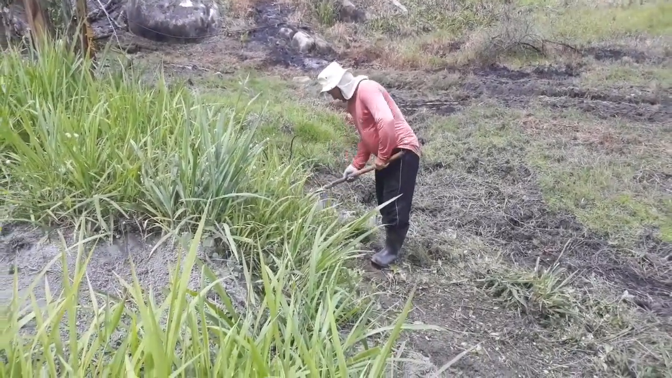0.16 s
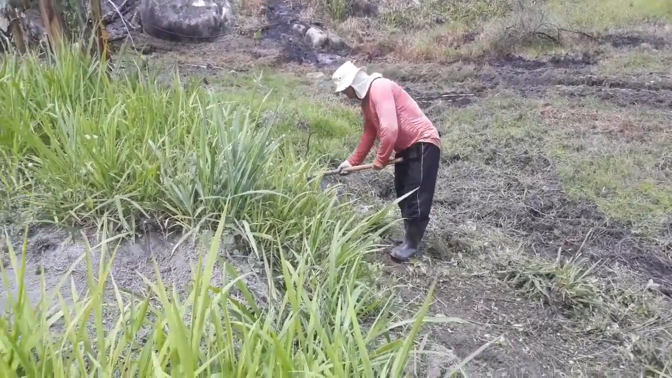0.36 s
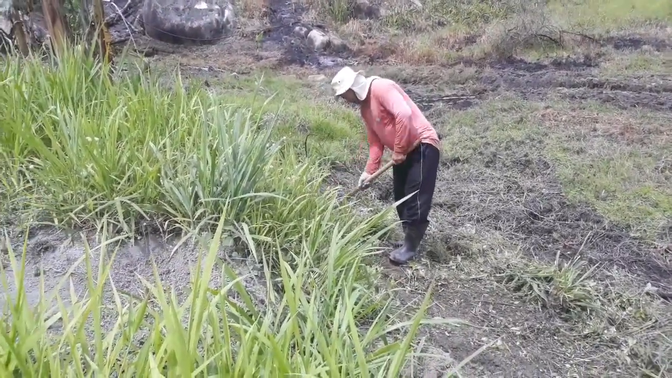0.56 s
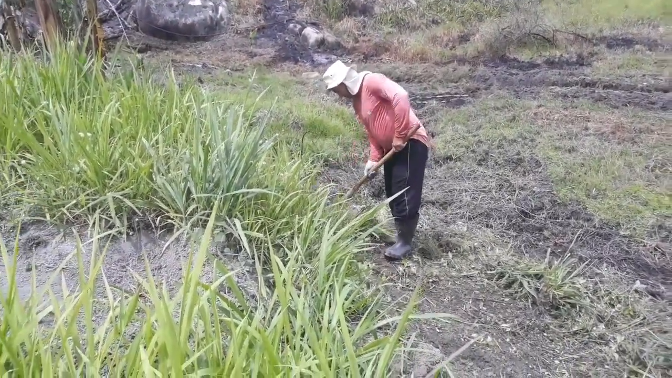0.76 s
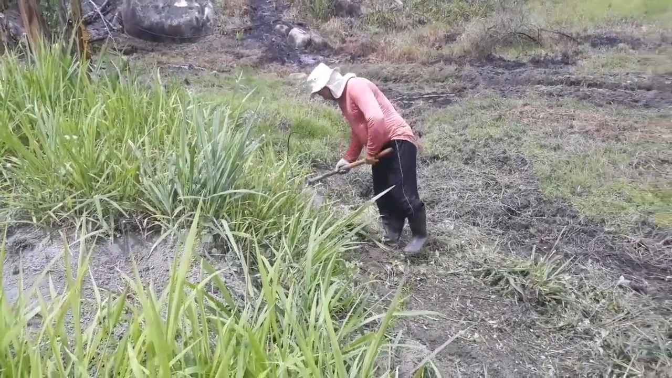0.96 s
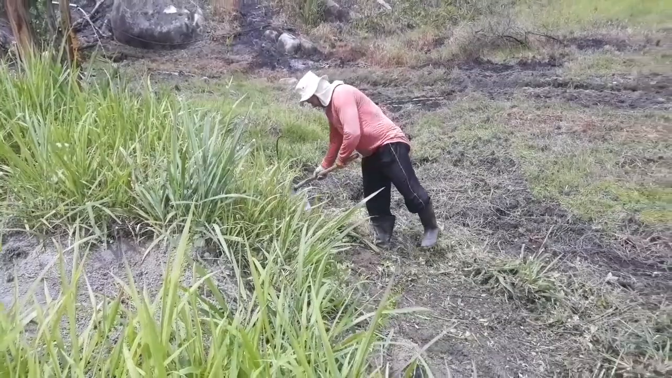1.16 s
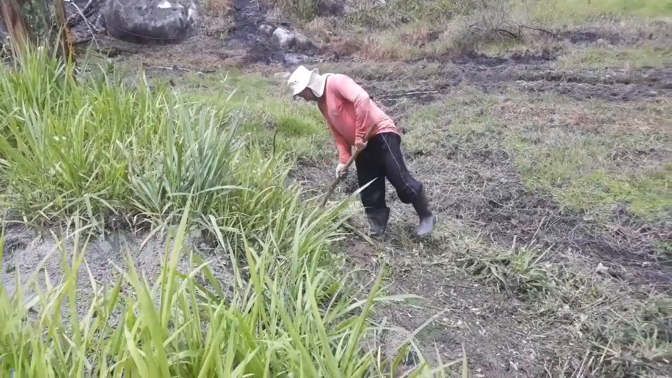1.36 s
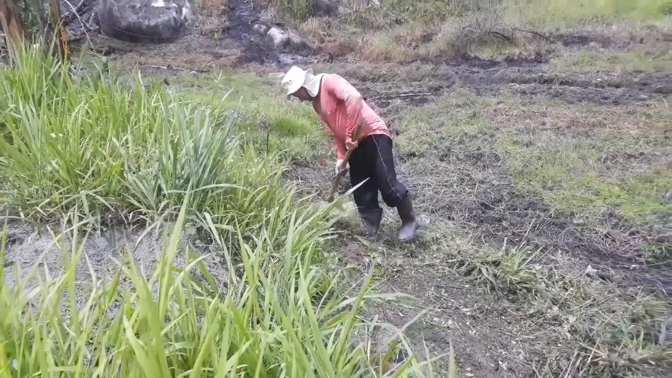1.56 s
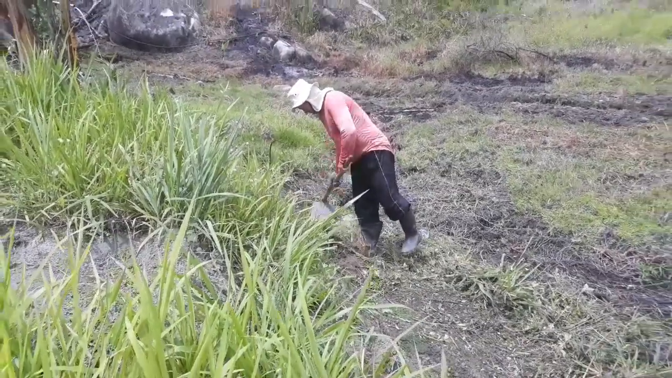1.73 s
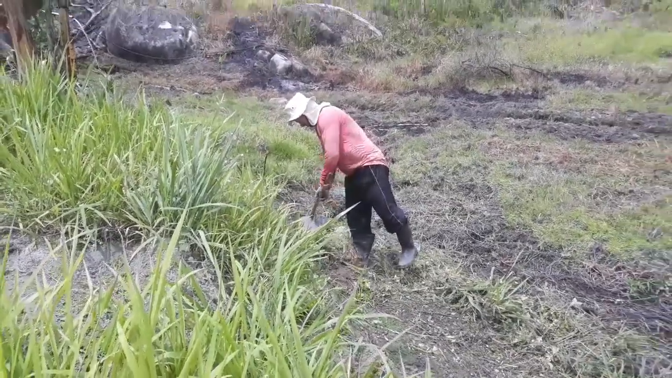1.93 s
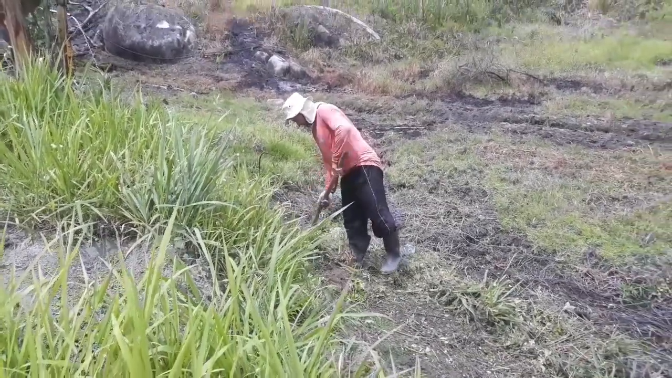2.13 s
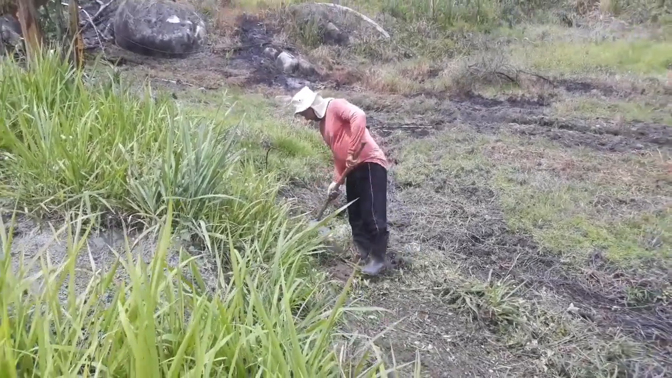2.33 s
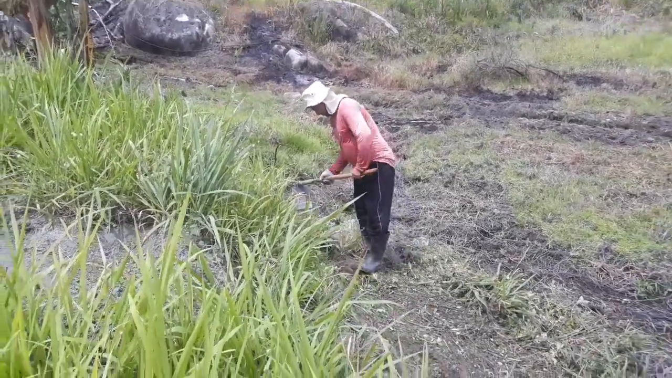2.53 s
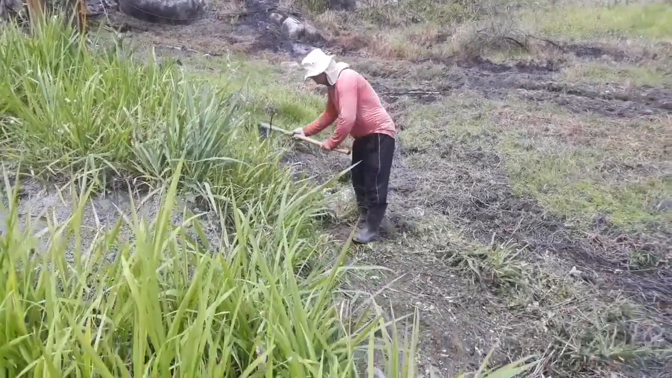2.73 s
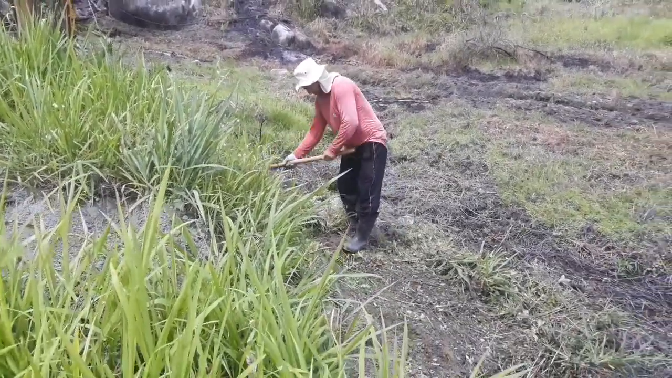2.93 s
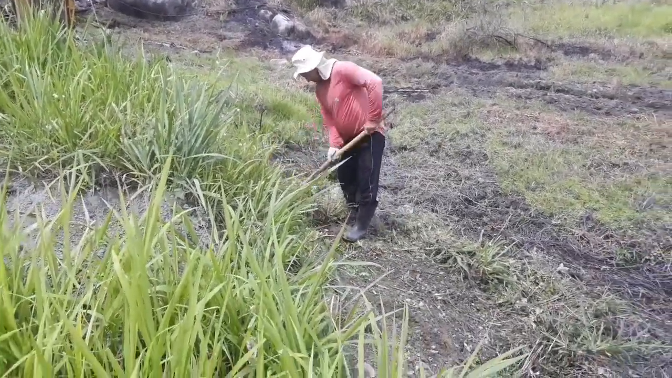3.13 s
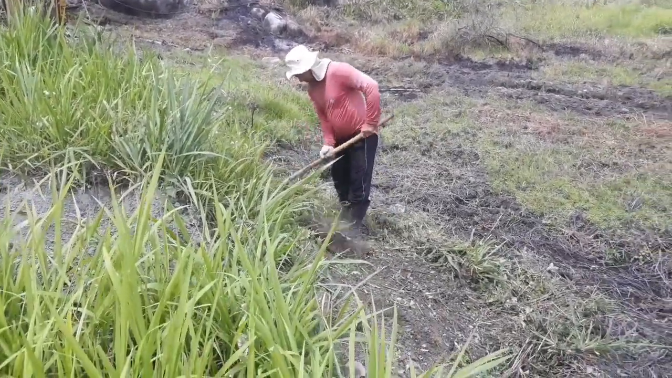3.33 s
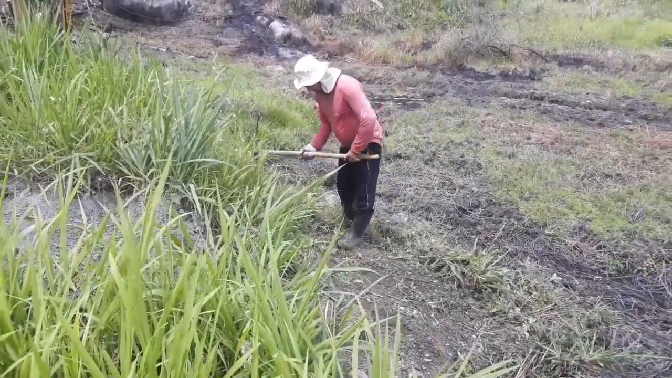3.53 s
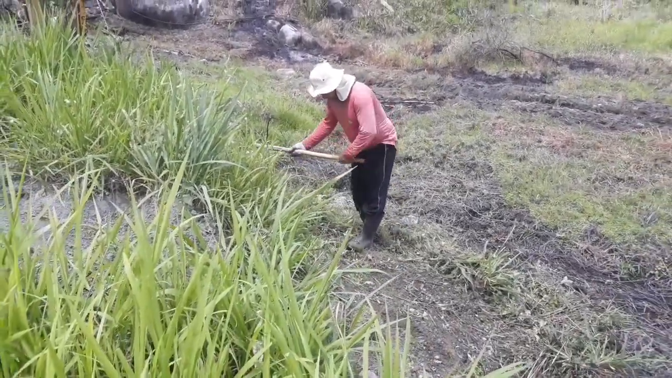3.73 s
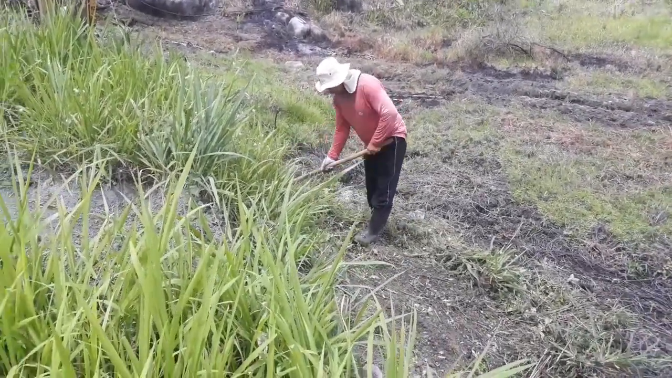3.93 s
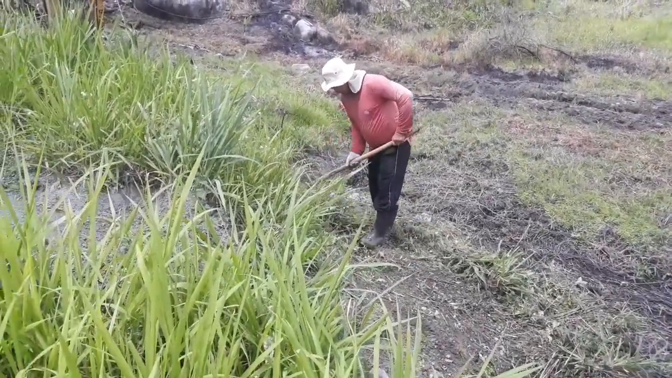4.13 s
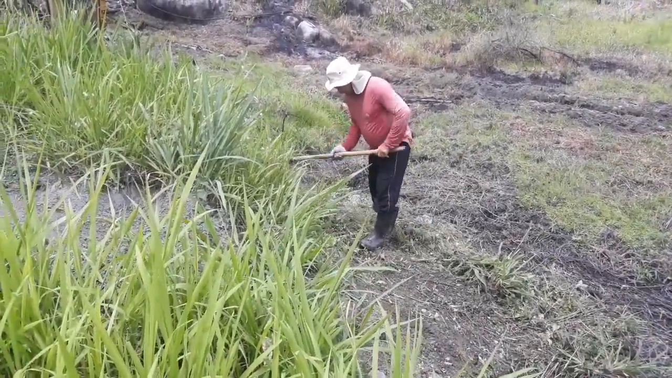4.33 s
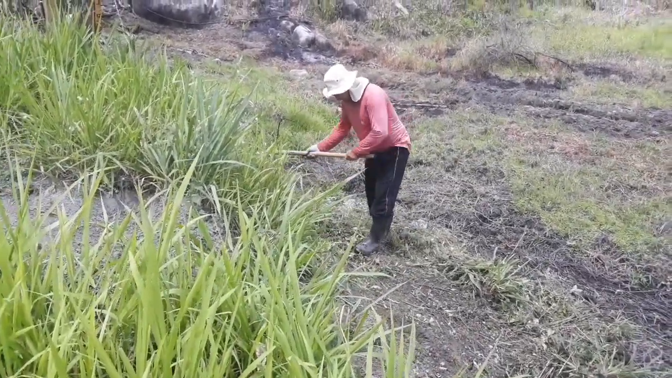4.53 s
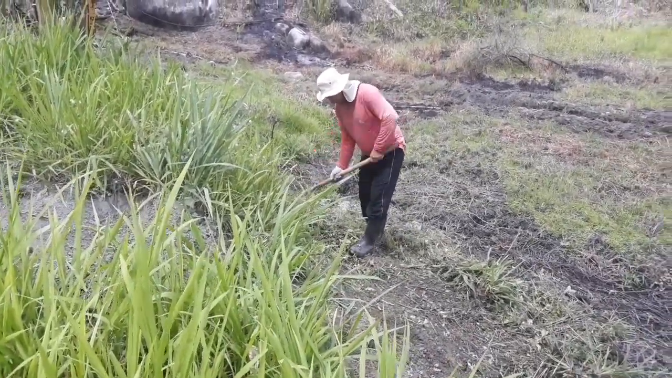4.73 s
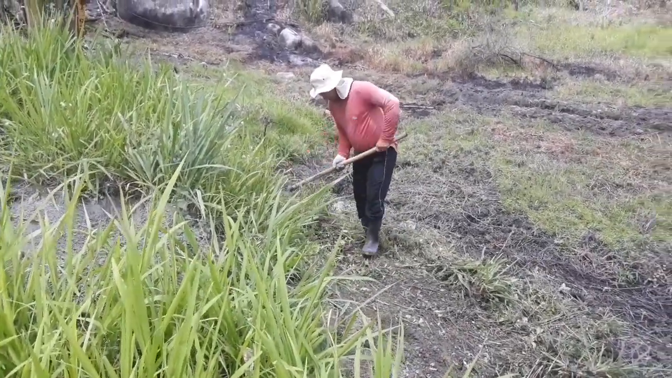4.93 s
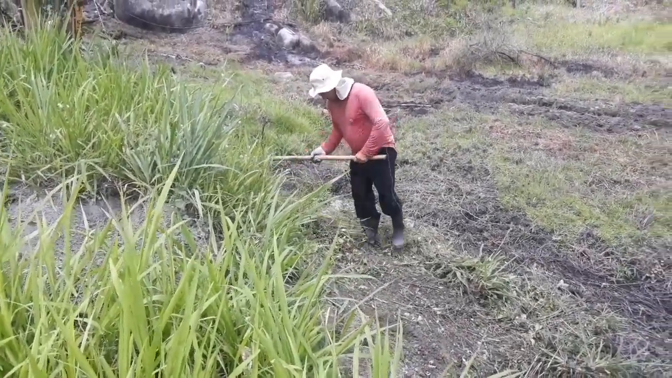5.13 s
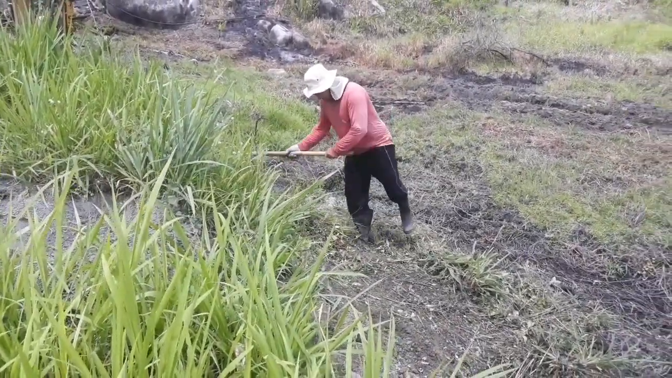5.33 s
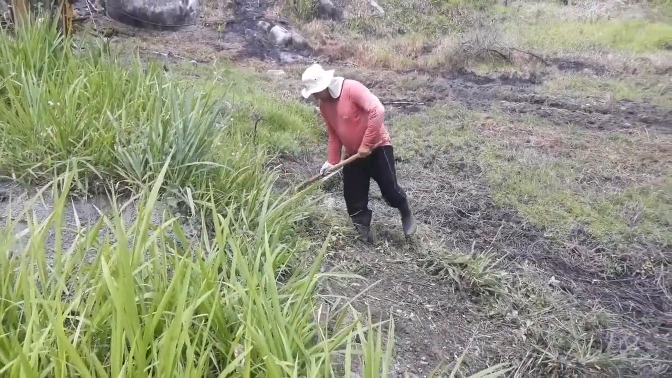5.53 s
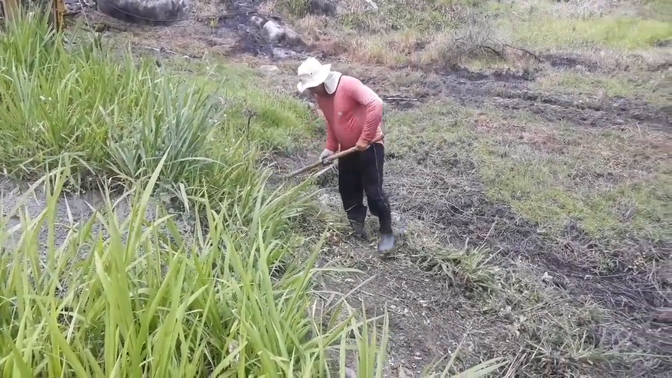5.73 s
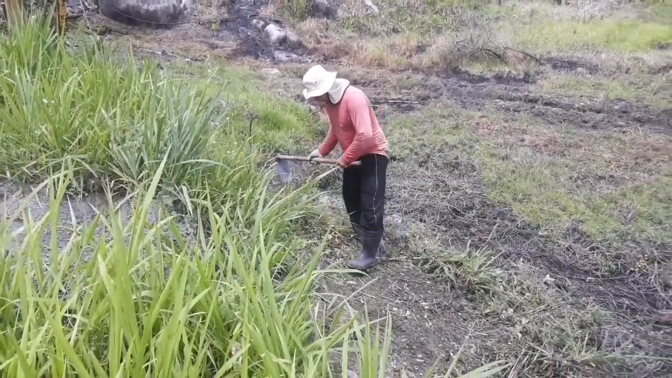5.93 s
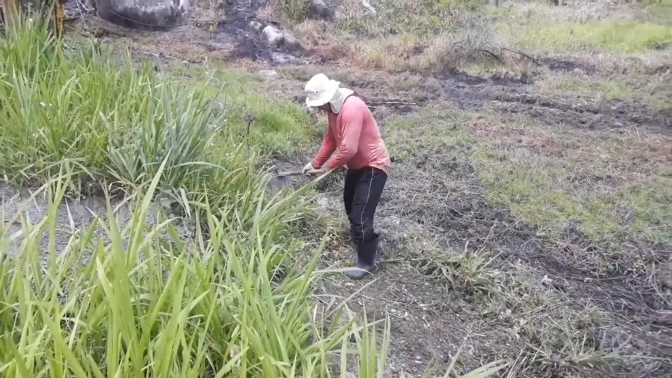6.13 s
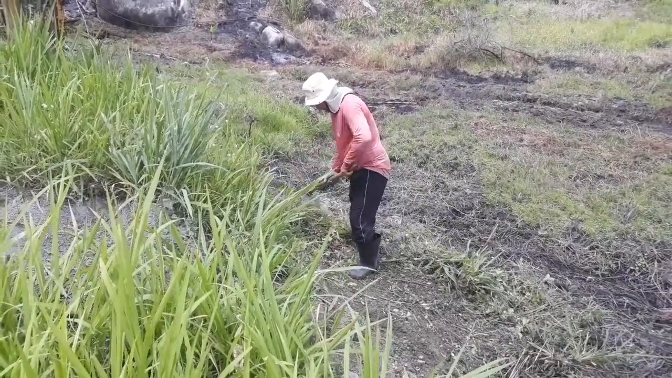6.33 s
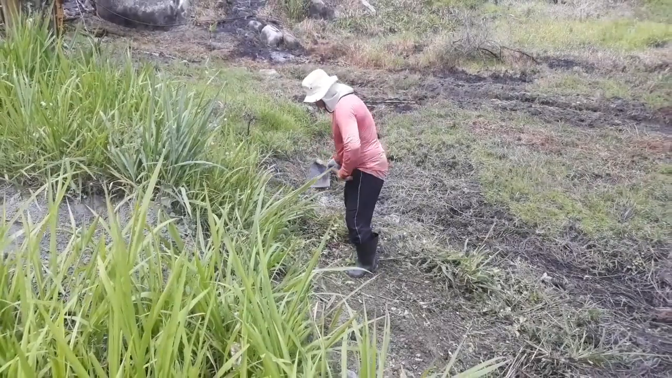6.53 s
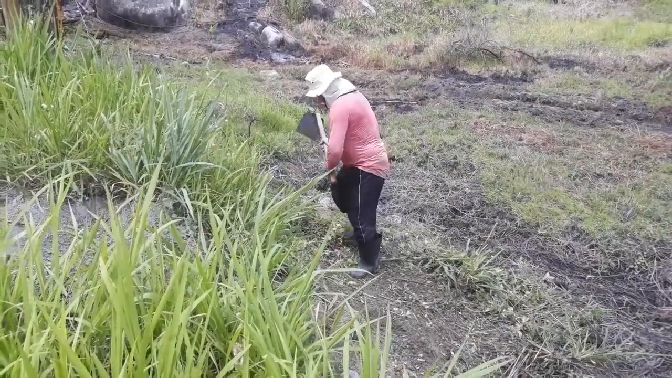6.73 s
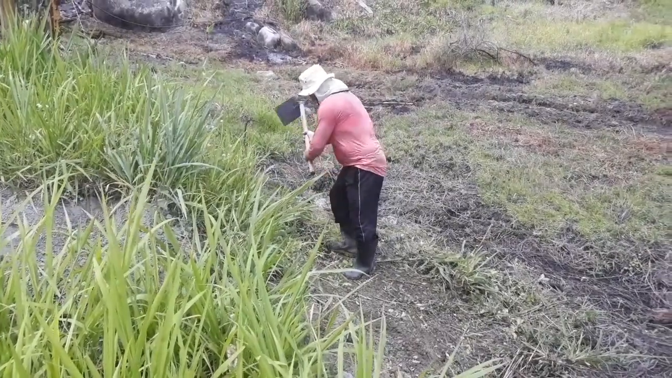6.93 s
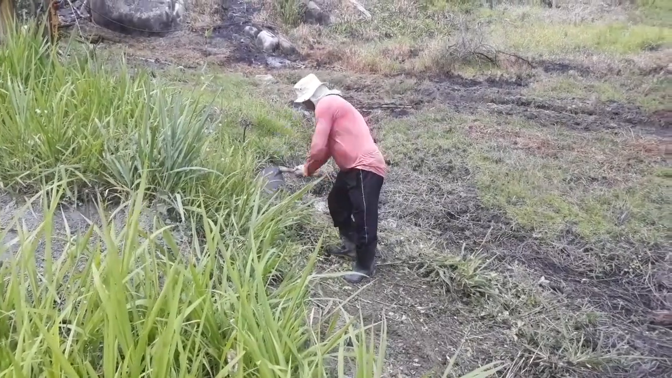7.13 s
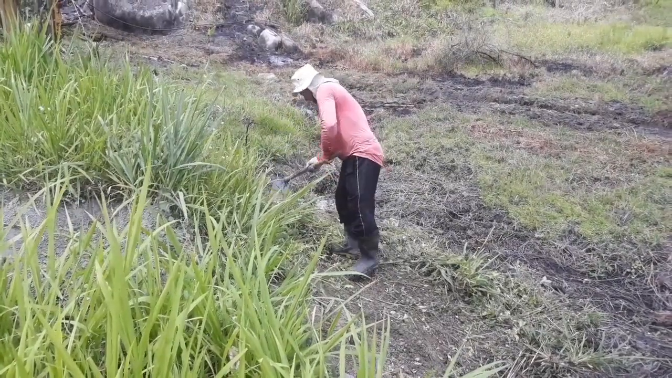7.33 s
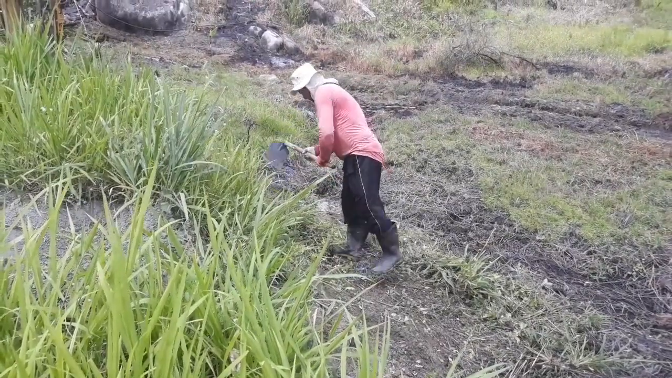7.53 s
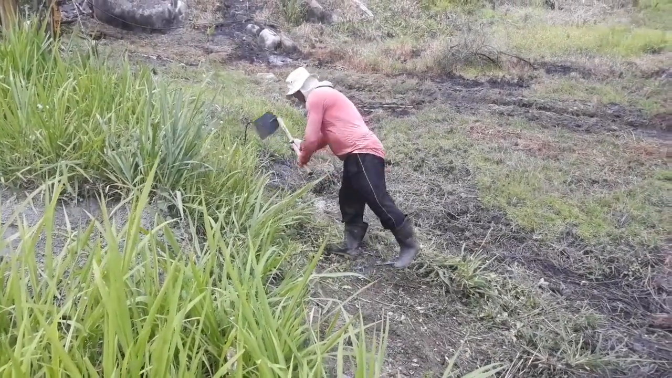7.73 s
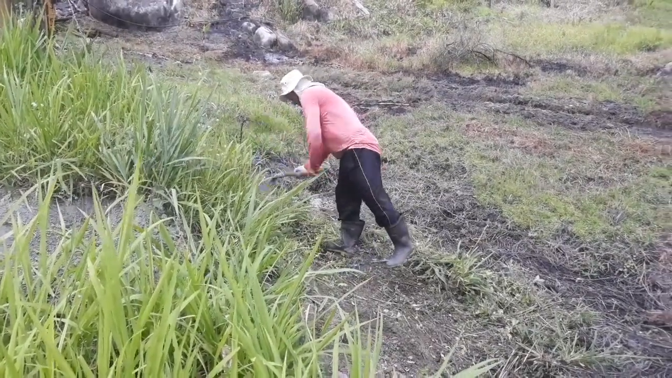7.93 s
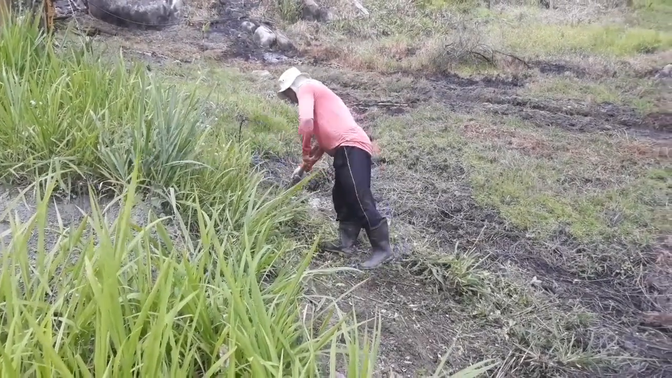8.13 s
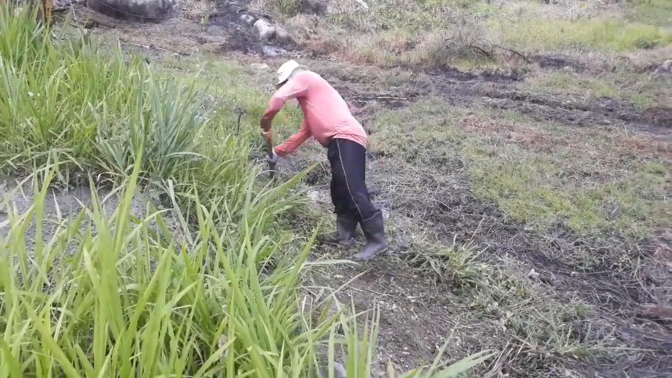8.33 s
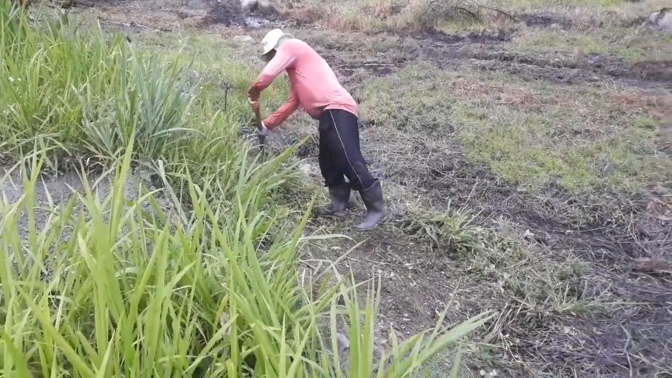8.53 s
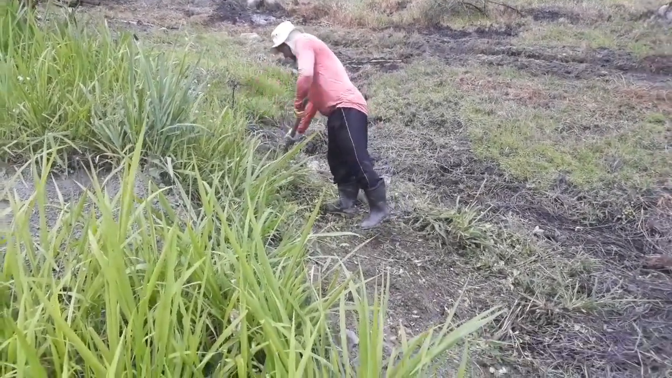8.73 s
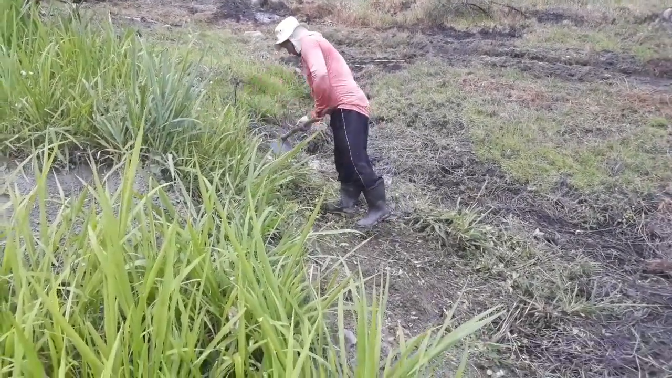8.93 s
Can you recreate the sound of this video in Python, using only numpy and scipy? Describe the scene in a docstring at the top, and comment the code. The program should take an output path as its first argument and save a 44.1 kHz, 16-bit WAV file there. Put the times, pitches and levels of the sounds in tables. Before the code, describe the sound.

A broad steel hoe chops weedy ground a few metres away, roughly every 0.8 seconds. Each stroke is a short cluster of gritty, metallic crunches with a woody knock, followed by snapping roots and rustling grass. Strokes near 3 and 8 seconds are hardest. A bird gives rising whistles near 1, 3.5 and 8 seconds. Open field, dry air, faint low wind on a small, thin-bassed microphone.

```python
"""Hoeing weedy soil

A steel hoe chops the soil some metres from the microphone: shaken grit crunches on a damped plate,
a wooden handle knocks, roots snap, and the freed blade rings as a set of decaying modes.
Filtered crackle makes grass rustle and clods thud. Gliding tones make a bird, a fly, a squeal and
mud round a boot; low noise makes light wind on the microphone and thumps through the ground."""
import sys
import numpy as np
from scipy import signal
from scipy.fft import rfft, irfft, next_fast_len
from scipy.io import wavfile
from scipy.ndimage import map_coordinates

SR = 44100
rng = np.random.default_rng(int(sys.argv[2]) if len(sys.argv) > 2 else 0)


def dump(signal):
    """Clip the signal to [-1, 1] and save it as 16-bit WAV at the path in sys.argv[1]."""
    limited = np.clip(np.atleast_2d(signal).T, -1, 1)
    pcm = np.round(limited * 32767).astype(np.int16)
    wavfile.write(sys.argv[1], SR, pcm)


def voltage_ratio(level):
    """Linear amplitude factor for a level in decibels (scalar or array-like)."""
    return 10 ** (np.asarray(level, float) / 20)


N = 399525

# the edge catches several times within a swing:
# start_s, level_db, push_s (time in the soil), thud_db and knock_db (relative to level_db)
BLOWS = [(0.5222, -21.5, .033, -28, -13), (0.5448, -19.5, 0.03, -20, -4), (0.5724, -31, 0.082, -18.5, -3),
         (1.312, -26, 0.069, -58, -4.5), (1.335, -16.5, 0.028, -48, -8), (1.355, -24, 0.027, -17.5, -1.5),
         (2.0228, -30.5, 0.037, -33, 5), (2.0629, -30.5, 0.022, -29, 2.5), (2.129, -30, 0.036, -20, 1),
         (2.179, -30, 0.025, -19.5, -5), (2.9853, -17.5, 0.039, -22, -10),
         (2.9993, -12.5, .017, -22.5, -9.5), (3.02, -20.5, 0.024, -23, -20),
         (3.038, -15.5, 0.013, -36, -16), (3.115, -21.5, 0.0096, -67, -24), (3.919, -23, 0.057, -34, -16),
         (3.947, -14.5, 0.034, -23, -23), (3.9824, -20.5, 0.046, -27.5, -18), (4.723, -20, 0.022, -33, -17),
         (4.7357, -17, .019, -20.5, -24), (4.752, -23.5, 0.041, -24.5, -13), (4.778, -31.5, 0.055, -24, -8),
         (5.493, -20.5, 0.026, -32, -29), (5.502, -13.5, 0.018, -28, -16), (5.525, -24.5, .017, -18, -7.5),
         (5.564, -26, 0.0079, -27, -18), (6.2161, -17.5, 0.016, -25, -7.5),
         (6.2378, -29.5, 0.03, -11.5, 6.5), (6.282, -34, 0.033, -19, 2.5), (6.836, -23, 0.015, -23, -7.5),
         (6.849, -22.5, 0.017, -25, -18), (7.198, -17.5, .011, -25, -5), (7.2077, -16, 0.0088, -11.5, -9),
         (7.2444, -26.5, 0.012, -21, 4.5), (7.9751, -12, 0.0095, -32, -10.5),
         (7.985, -13.5, 0.0095, -18, -3), (8.746, -30, 0.013, -18.5, -5.5)]
# one swing of the hoe: start_s, handle_hz (set by the grip), low_plate_db, sizzle_db (relative to a blow)
STROKES = [(.5, 988, -8, -22.5), (1.3, 980, -13, -18), (2.0, 1116, -5.5, -17.5), (2.9, 1060, -10.5, -33),
           (3.9, 1000, -11, -25), (4.7, 1020, -6.5, -24), (5.4, 920, -8.5, -33), (6.2, 1065, -8.5, -13),
           (6.8, 1125, -21, -12.5), (7.1, 1086, -12, -19), (7.9, 1134, -13, -14), (8.7, 1050, -10, -26)]


def blows():
    """The edge crunches while in the soil; the wooden handle knocks at a pitch set by the grip."""
    # each blow belongs to the latest swing begun before it
    swings = [[row[1:] for row in STROKES if row[0] < s][-1] for s, *_ in BLOWS]
    forces = []
    for (s, db, stay, thud_db, _), (_, low_db, sizzle_db) in zip(BLOWS, swings):
        forces.append((s, stay, db, thud_db, low_db, sizzle_db))
    out = crunch(*pushes(forces, tail_db=-17))

    t = np.arange(SR // 10) / SR
    jolts = rng.standard_normal((len(BLOWS), len(t)))
    for (s, db, stay, _, knock_db), (handle_hz, _, _), jolt in zip(BLOWS, swings, jolts):
        handle = np.sin(2 * np.pi * handle_hz * t) * voltage_ratio(-60 * t / .03)  # falls 60 dB in 30 ms
        shake = jolt * np.exp(-(t / max(stay, .002)) ** 2)
        knock = unit(signal.fftconvolve(shake, handle)[:len(t)])
        out[round(s * SR):][:len(t)] += voltage_ratio(db + knock_db - 20.5) * knock
    return out


def pushes(rows, tail_db):
    """Force envelopes from rows (s, seconds, dB, relative dB ..): a swell, a sudden stop, a trail of crumbs."""
    t = np.arange(SR // 8) / SR
    power = np.zeros((len(rows[0]) - 2, N + len(t)))
    crumbs = voltage_ratio(tail_db) * np.exp(-t / .035)
    for s, stay, db, *rel_db in rows:
        stay = max(stay, .002)
        swell = 1 - np.exp(-t / (0.35 * stay))
        push = swell * (np.exp(-(t / stay) ** 3) + crumbs)
        levels = voltage_ratio(db + np.array([0, *rel_db]))[:, None]
        start = round((s - .002) * SR)
        power[:, start:][:, :len(t)] += (levels * push) ** 2
    return np.sqrt(power[:, :N])


# colour of rustling grass and of the edge in grit: pitch_hz, level_db (per Hz)
GRASS = [(760, -43), (1300, -61), (1660, 6.5), (1840, -24), (1890, -5.5), (2100, 0.5), (2810, -4.5),
         (3050, 2), (3380, -0.5), (4350, 3.5), (6210, -4.5), (8420, -3), (9800, -20.5), (12700, -19),
         (21600, -120)]
# colour of the finest rustle and sizzle: pitch_hz, level_db (per Hz)
FINE = [(5410, -10), (9200, -11), (9960, -13), (11700, -10.5), (14000, -4.5), (15600, -9.5)]
# colour of the thudding soil: pitch_hz, level_db (per Hz)
SOIL = [(35, -43), (60, -10.5), (247, 0.5), (389, -2), (585, -4.5), (759, -9.5), (900, -7.5), (1170, 1),
        (1980, -120)]


def crunch(top, thud, low, sizzle):
    """Four force envelopes shake grit against the plate and the soil."""
    grit = crackle(4000, spread_db=2.5, hiss=.6)
    soil = coloured(crackle(500, spread_db=1.5, hiss=.8), SOIL)

    def rms(envelope):
        return np.sqrt(np.mean(envelope ** 2))

    plate = rms(top) * damped_blade(top * grit, lo_hz=2200, hi_hz=9000)
    low_plate = rms(low) * damped_blade(low * grit, lo_hz=1100, hi_hz=2200)
    edge = plate + voltage_ratio(-1.5) * top * coloured(grit, GRASS)
    return (voltage_ratio(-12) * edge + voltage_ratio(-5.5) * low_plate
            + voltage_ratio(0.5) * thud * soil + voltage_ratio(3) * sizzle * coloured(grit, FINE))


# the blade as a plate, levels relative between modes:
# pitch_hz, soil_width_hz, soil_level_db, free_level_db, free_t60_s
BLADE = [(1259, 47, -1.5, -17.5, 2.8), (1690, 60, 3.5, -6, .3), (1948, 48, 3, 0.5, 2.22),
         (2400, 39, -6, -15, 0.4), (2965, 37, -6, -16, .3), (3460, 34, -21, -18, .2),
         (4270, 59, -3, -22, .2), (4695, 44, -7, -22, 0.22), (5300, 74, -5, -16, 0.51),
         (5530, 99, -15, -25, .3), (6500, 320, -13.5, -35, .3), (7630, 150, -20, -28, .3)]


def damped_blade(x, lo_hz, hi_hz):
    """Modes in a band, choked by soil, rms 1; the moving contact point favours now one, now another."""
    modes = [(hz, width, db) for hz, width, db, _, _ in BLADE if lo_hz < hz < hi_hz]
    rung = np.zeros(N)
    for k, (hz, width_hz, db) in enumerate(modes):
        favour = voltage_ratio(2.5 * wobble(9))
        b, a = signal.iirpeak(hz, hz / width_hz, SR)
        rung += (-1) ** k * voltage_ratio(db) * signal.lfilter(b, a, x * favour)
    # a small plate radiates little below its modes
    highpass = signal.butter(2, .8 * lo_hz, "high", fs=SR, output="sos")
    return unit(signal.sosfilt(highpass, rung))


# the blade comes free and rings: start_s, level_db, ring_share (of each mode's free ring time)
LIFTS = [(.8, -54, 0.48), (2.88, -48.5, .4), (3.03, -48.5, 0.74), (4.05, -60, 1), (4.78, -53.5, 0.92),
         (5.62, -51.5, 0.88), (6.36, -47.5, 0.34), (7.255, -38, 0.81)]


def ringing():
    """Out of the soil the plate rings freely, each mode at a new strength."""
    out, t = np.zeros(N + 2 * SR), np.arange(SR) / SR
    onset = 1 - np.exp(-t / 0.014)
    for s, db, share in LIFTS:
        ring = np.zeros(SR)
        for hz, _, _, free_db, t60 in BLADE:
            strength_db = free_db + rng.normal(0, 1.5)
            ring += voltage_ratio(strength_db - 60 * t / (share * t60)) * np.sin(2 * np.pi * hz * t)
        out[round(s * SR):][:SR] += voltage_ratio(db) * ring * onset
    return out[:N]


# stems and roots snap: start_s, level_db, thud_db, low_plate_db, sizzle_db (last three relative to level_db)
SNAPS = [(0.039, -34.5, -33, -38, -19), (0.1913, -38, -13, -5, -17), (0.366, -33, -30, -13, -33),
         (1.5214, -36, -44, -10, -8), (1.862, -34.5, -20, -18, -28), (1.894, -32, -36, -17, -34),
         (2.2214, -44, -15, -16, -12), (2.4232, -35.5, -10, -18, -24), (2.4684, -43.5, -3, -12, -14),
         (2.4944, -44.5, -6, -14, -7), (2.622, -38, -35, 2.5, -23), (2.846, -39.5, -32, -3, -20),
         (2.9018, -35.5, -54, -5, -17), (3.155, -24, -26, -30, -27), (3.259, -28.5, -21.5, -16, -26),
         (3.3016, -31.5, -21, -11, -6), (3.3446, -30.5, -19, -5, -12), (3.37, -27.5, -13, -21, -18),
         (3.3893, -23, -23.5, -29, -20), (3.8636, -32, -39, -14, -28), (4.088, -34.5, -28, -20, -8.5),
         (4.178, -37, -23, -1, -22), (4.2545, -28, -26, -10, -21), (4.32, -36, -5.5, -6, -18),
         (4.868, -32.5, -33, -12, -33), (5.372, -39, -28, -30, -12), (5.6417, -33, -38, -26, -7),
         (6.7062, -41, -35, 2.5, -21), (6.772, -34.5, -37, -23, -13), (7.082, -33, -21, -27, -33),
         (7.157, -40.5, -6.5, -1, -21), (7.9037, -29, -31, -10, -51), (8.07, -40, -11, -16, -21),
         (8.2935, -41.5, -2, -15, -25), (8.312, -33, -13, -20, -29), (8.336, -41, 0.5, -4, -25),
         (8.4592, -42.5, -5.5, 0, -24), (8.632, -52, -35, -8, -21), (8.6534, -42, -37, -3.5, -28),
         (8.553, -36, -35, -25, -21), (8.672, -42, -35, -25, -24), (8.699, -34, -34, -9, -36),
         (8.894, -40.5, -34, 1.5, -22)]


def snaps():
    """Stems and roots break in short pushes that reach the blade too."""
    return crunch(*pushes([(s, .007, *levels) for s, *levels in SNAPS], tail_db=-12.5))


# short single rings of the blade or the wooden handle: start_s, pitch_hz, level_db, t60_s
PINGS = [(.675, 997, -42.5, 0.13), (2.03, 540, -48.5, 0.4), (2.032, 1690, -38.5, 0.45),
         (2.026, 4750, -40.5, .1), (2.069, 4700, -40, 0.15), (2.13, 521, -47, 0.32),
         (3.005, 624, -33, 0.17), (4.801, 4695, -42, 0.25), (4.86, 2400, -41.5, 0.14),
         (4.86, 3740, -40, 0.16), (5.563, 1948, -38.5, 0.38), (5.565, 5300, -47, 0.074),
         (6.219, 2965, -35, 0.21), (6.28, 4270, -39, 0.13), (7.198, 2965, -27, 0.053),
         (7.251, 4270, -33.5, 0.12), (7.976, 4270, -17, 0.045), (8.701, 1100, -54.5, 1)]


def pings():
    """Single ringing pitches: each dies away, wavering in size and phase."""
    out, t = np.zeros(N + SR), np.arange(SR // 2) / SR
    size_db, phase = 3.5 * wobble(150), .7 * wobble(120)
    onset = 1 - np.exp(-t / 0.00096)
    for s, hz, db, t60 in PINGS:
        start = round(s * SR)
        waver = np.pad(phase, (0, SR))[start:][:len(t)]
        decay = voltage_ratio(db - 60 * t / t60)
        out[start:][:len(t)] += decay * onset * np.sin(2 * np.pi * hz * t + waver)
    return out[:N] * voltage_ratio(size_db)


# the edge skids on a stone: time_s, pitch_hz, level_db
SQUEAL = [(2.84, 4550, -64), (2.9, 4640, -52), (2.96, 4660, -43), (3.05, 4560, -28)]
# a tone without overtones: multiple, level_db
PURE = [(1, 0)]


def squeal():
    """A rough narrow whine: noise rides on the tone."""
    return tone(SQUEAL, PURE, edge=.02, flutter_db=1.5) * unit(.35 + wobble(420))


# the hoe pulls through the weeds or a boot shifts:
# peak_s, rise_s, grass_db, finest_rustle_db, clods_db
PULLS = [(.02, 0.44, -54.5, -55.5, -70.5), (.7, 0.16, -47.5, -47, -63.5), (.95, 0.37, -54, -54.5, -90),
         (1.49, 0.22, -45.5, -51.5, -77), (1.67, 0.34, -52, -53.5, -63.5), (2.22, 0.1, -46, -46.5, -61),
         (2.4, 0.21, -53, -49, -61), (3.06, 0.1, -37, -41.5, -57), (3.25, 0.26, -49, -48, -80),
         (3.41, .11, -44.5, -41, -62), (3.75, 0.3, -54, -56.5, -66.5), (4.04, 0.04, -43, -53, -60),
         (4.25, 0.28, -49, -49.5, -56.5), (4.86, 0.09, -47, -51, -62), (5.07, 0.19, -54, -52.5, -66.5),
         (5.58, 0.078, -43.5, -58, -63), (5.93, 0.32, -55.5, -55.5, -81), (6.08, .05, -68, -64, -62),
         (6.38, 0.18, -51, -59, -79), (6.76, 0.39, -52.5, -56, -65.5), (7.3, 0.18, -55, -65, -59.5),
         (7.519, 0.13, -52.5, -87, -88), (8.1, 0.18, -49, -72, -68), (8.42, 0.14, -52, -73, -62.5),
         (9.04, 0.099, -58, -70, -84)]
# the quiet between pulls: grass_db, finest_rustle_db, scrape_db, clods_db
STILL_DB = [-53, -59, -60, -71.5]
# colour of the dragged blade: pitch_hz, level_db (per Hz)
SCRAPE = [(380, -114), (650, -9.5), (944, -3), (1130, -0.5), (1250, -4), (1660, 0.5), (1850, 3),
          (1890, -5.5), (2100, -6.5), (2730, 2), (4620, -120)]
# colour of dropping clods and boots: pitch_hz, level_db (per Hz)
CLODS = [(53, -46), (90, -14), (140, -8), (194, 0), (270, -3), (446, -5.5), (800, -9.5), (1040, -22),
         (1760, -120)]


def dragging():
    """Stems snap and rub and the blade scrapes, flickering together; clods and boots drop."""
    scrape_under_db = 8.5  # the dragged blade's swells, below the grass
    efforts = [(s, width, grass, fine, grass - scrape_under_db, clods) for s, width, grass, fine, clods in PULLS]
    grass_db, fine_db, scrape_db, clod_db = swells(efforts, STILL_DB)
    flicker_db = 0.53 * wobble(4.3) + 1.52 * wobble(45)
    stems = crackle(1500, spread_db=-1.5, hiss=0.73)
    grass = voltage_ratio(grass_db + flicker_db - 2.4) * coloured(stems, GRASS)
    fine = voltage_ratio(fine_db + flicker_db - 2.5) * coloured(stems, FINE)

    rub = coloured(crackle(400, spread_db=-0.5, hiss=0.89), SCRAPE)
    scrape = voltage_ratio(scrape_db + flicker_db + 0.54 * wobble(60)) * rub
    drops = coloured(crackle(120, spread_db=1, hiss=0.83), CLODS)
    clods = voltage_ratio(clod_db + 1.4 * wobble(30)) * drops

    # loose crumbs patter on one mode of the plate
    bounce_db = 2.5 * wobble(70)
    crumbs = crackle(130, spread_db=1, hiss=.1)
    patter = voltage_ratio(scrape_db - 7.5 + bounce_db) * damped_blade(crumbs, lo_hz=1500, hi_hz=1800)
    return grass + fine + scrape + patter + clods


def swells(rows, still_db):
    """Levels in dB from rows (s, seconds, dB ..): smooth swells over a steady bed, one curve a column."""
    release = 0.98  # fade time over rise time
    t = np.arange(0, N / SR + .01, .002)
    power = voltage_ratio(still_db)[:, None] ** 2 + 0 * t
    for s, width, *db in rows:
        u = (t - s) / np.where(t < s, width, release * width)
        power = power + voltage_ratio(db)[:, None] ** 2 * np.exp(-2 * u ** 2)
    return [np.interp(np.arange(N) / SR, t, 10 * np.log10(p)) for p in power]


# bent chirps, the first call from further off; one table a note: time_s, pitch_hz, level_db
CHIRPS = [
    [(.21, 2120, -58), (.29, 2425, -59), (.44, 2460, -61)],
    [(.73, 1754, -57), (.762, 1920, -60), (.787, 2200, -49), (.812, 2580, -51), (.84, 2880, -62)],
    [(3.28, 2115, -62), (3.3, 2250, -49), (3.316, 2550, -52), (3.34, 2670, -62)],
    [(7.74, 1970, -60), (7.755, 2250, -45), (7.768, 2520, -51), (7.8, 2670, -55)],
]
# a climb: start_s, length_s, from_hz, to_hz, level_db
CLIMBS = [(.885, .166, 1680, 2026, -43.5), (3.43, 0.12, 1770, 1990, -49.5), (7.862, .113, 1690, 1910, -50)]
# a held whistle: start_s, length_s, from_hz, to_hz, level_db
WHISTLES = [(1.052, 0.25, 2390, 2528, -41), (3.548, .222, 2430, 2545, -39),
            (7.985, .266, 2325, 2487, -41.5)]
# shape of a climb, relative to its level: start_db, third_db, end_db
CLIMB_DB = (-10, -10.5, 0)
# shape of a whistle, relative to its level: start_db, third_db, end_db
WHISTLE_DB = (1.5, -1, -3)


def bird():
    """Pure whistles; two far surfaces send them back, blurred."""
    song = sum(tone(note, PURE, edge=.004, flutter_db=0) for note in CHIRPS)
    song = song + glides(CLIMBS, CLIMB_DB, edge=0.0035, flutter_db=-0.5)
    song = song + glides(WHISTLES, WHISTLE_DB, edge=.003, flutter_db=0.5)
    echoes = np.zeros(N)
    for delay_s, db in [(.036, -16), (.115, -19)]:
        late = np.pad(song, (round(delay_s * SR), 0))[:N]
        echoes += voltage_ratio(db + 3 * wobble(40)) * late
    return song + echoes


def glides(notes, shape_db, edge, flutter_db):
    """Straight slides in pitch that share one level shape."""
    parts = list(zip((0, 1 / 3, 1), shape_db))
    out = np.zeros(N)
    for s, length, lo, hi, db in notes:
        rows = [(s + u * length, lo + u * (hi - lo), db + rel_db) for u, rel_db in parts]
        out += tone(rows, PURE, edge, flutter_db)
    return out


# a fly passes: time_s, wingbeat_hz, level_db
FLY = [(4.235, 209, -63), (4.289, 209.6, -58.5), (4.309, 213.4, -64.5), (4.361, 215.7, -53),
       (4.413, 205, -64.5), (4.44, 212, -74)]
# overtones of the wingbeat: multiple, level_db
WING = [(1, 4), (2, 3.5), (3, -23), (4, 1), (5, -1), (6, -3), (7, -16), (8, -21), (9, -11), (10, -19),
        (11, -3)]


def fly():
    """The wingbeat and its multiples make a buzz that bends in pitch."""
    return tone(FLY, WING, edge=0.013, flutter_db=1.5)


# mud gurgles round a boot: start_s, length_s, from_hz, to_hz, level_db
SUCK = [(8.385, .06, 250, 270, -58), (8.455, .085, 320, 345, -54), (8.49, .08, 195, 238, -48)]
# shape of a gurgle, relative to its level: start_db, third_db, end_db
BUBBLE_DB = (-8, -3, -2.5)


def boot():
    """Mud gurgles in low tones that slide upwards, fluttering in level."""
    return glides(SUCK, BUBBLE_DB, edge=0.0097, flutter_db=5.5)


# low swells, wind gusts and thumps of the hoe through the ground: peak_s, rise_s, level_db
LOW_SWELLS = [(.4, .2, -75), (.88, 0.21, -70.5), (1.5, 0.16, -70), (2.6, .1, -72), (2.92, .1, -75),
              (3.9, .2, -72), (4.5, 0.088, -76), (4.74, 0.09, -63), (5.54, .07, -68), (6.27, 0.044, -71),
              (6.58, .15, -72), (7.23, 0.037, -51), (7.62, 0.43, -70), (8.07, .04, -54.5),
              (8.27, 0.14, -60.5), (9.03, 0.31, -69)]
# colour of the low rumble: pitch_hz, level_db (per Hz)
RUMBLE = [(12, -37), (20, -10), (75, 1), (140, -1.5), (180, -9.5), (310, -120)]


def low_rumble():
    """Low lumpy rumble: wind on the microphone and thumps through the ground."""
    low_db = swells(LOW_SWELLS, [-73])[0]  # over a steady bed
    rumble = coloured(rng.standard_normal(N), RUMBLE)
    return voltage_ratio(low_db + 3.5) * unit(voltage_ratio(0.5 * wobble(6.9)) * rumble)


def tone(rows, orders, edge, flutter_db):
    """A note that follows (s, Hz, dB) rows, with (multiple, dB) overtones and soft ends of edge seconds."""
    hz, db = curves(rows)
    t = np.arange(N) / SR
    gate = np.clip(np.minimum(t - rows[0][0], rows[-1][0] - t) / edge, 0, 1)
    span = gate > 0
    phase = 2 * np.pi * np.cumsum(hz[span]) / SR
    out = np.zeros(N)
    out[span] = sum(voltage_ratio(level) * np.sin(k * phase) for k, level in orders)
    return np.sqrt(2) * out * gate * voltage_ratio(db + flutter_db * wobble(60))


def crackle(rate, spread_db, hiss):
    """Sparse snaps of unequal size, rate a second, over hiss that takes a share of the power."""
    size = np.minimum(rng.exponential(size=N), 2.5)
    struck = rng.random(N) < rate / SR
    grains = struck * rng.standard_normal(N) * voltage_ratio(spread_db * size)
    return unit(grains) * np.sqrt(1 - hiss) + rng.standard_normal(N) * np.sqrt(hiss)


def coloured(x, spectrum):
    """x with the colour of (Hz, dB) points, falling steeply below the first, rms 1."""
    hz, db = np.transpose(spectrum)

    def response(f):
        octaves_below = np.log2(np.maximum(hz[0] / (f + 1), 1))
        return voltage_ratio(np.interp(np.log(f + 1), np.log(hz), db) - 40 * octaves_below)

    return unit(filtered(x, response))


def filtered(x, response):
    """x times a complex response of frequency."""
    m = next_fast_len(N + SR // 2)
    return irfft(rfft(x, m) * response(np.fft.rfftfreq(m, 1 / SR)), m)[:N]


def wobble(rate):
    """A smooth random curve, rate knots a second."""
    coarse = np.arange(0, N + 16, 16)
    knots = rng.standard_normal(int(N * rate / SR) + 4)
    return np.interp(np.arange(N), coarse, map_coordinates(knots, [coarse * rate / SR]))


def curves(rows):
    """One value per sample for each column after the time."""
    s, *cols = np.transpose(rows)
    return [np.interp(np.arange(N) / SR, s, c) for c in cols]


def unit(x):
    """Scaled to rms 1."""
    return x / np.sqrt(np.mean(x ** 2) + 1e-20)


def scene():
    """Everything heard from one spot."""
    hoe = blows() + ringing() + snaps() + pings() + squeal() + dragging()
    return (hoe + bird() + fly() + boot() + low_rumble())[None]


def low_pass(x):
    """Removes everything above the highest recorded frequency."""
    return signal.sosfilt(signal.butter(12, 16650, fs=SR, output="sos"), x)


def record(dry):
    """A small microphone: weak deep bass, nothing above its band limit."""
    def microphone(hz):
        bass_cut = (1j * hz / (55 + 1j * hz)) ** 2
        return (hz < 15750) * bass_cut

    mix = filtered(dry[0], microphone)[None]
    return low_pass(mix)


dry = scene()
out = record(dry)
dump(out)
```